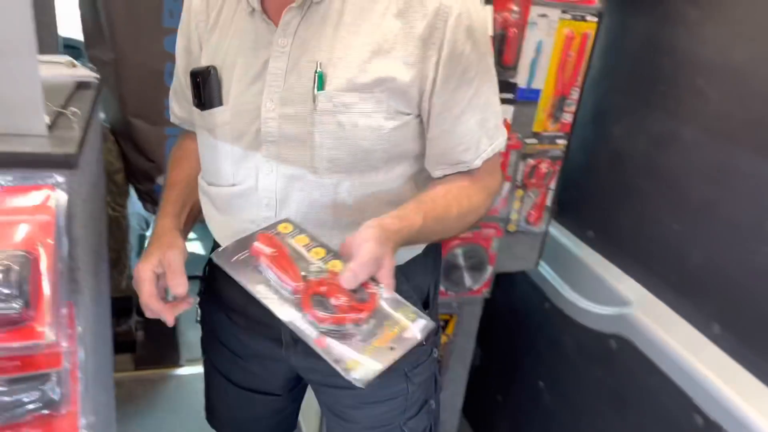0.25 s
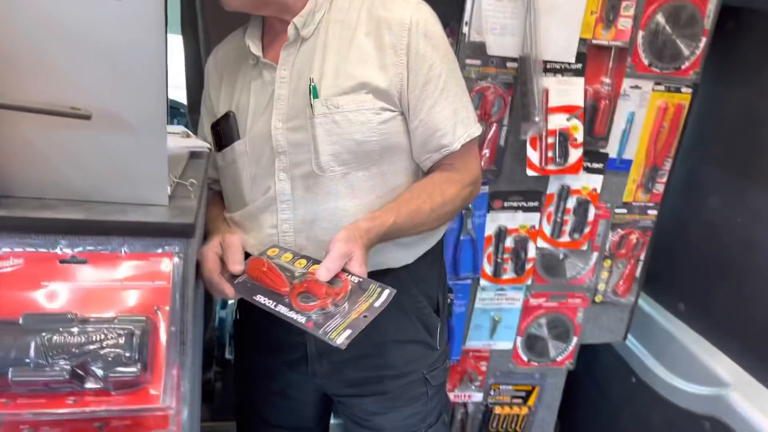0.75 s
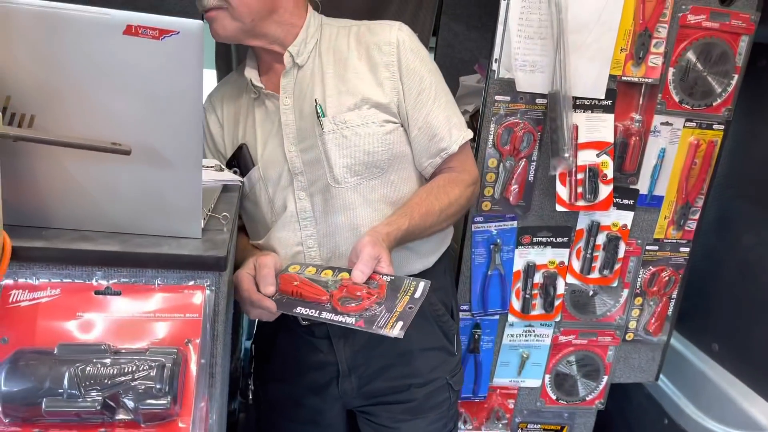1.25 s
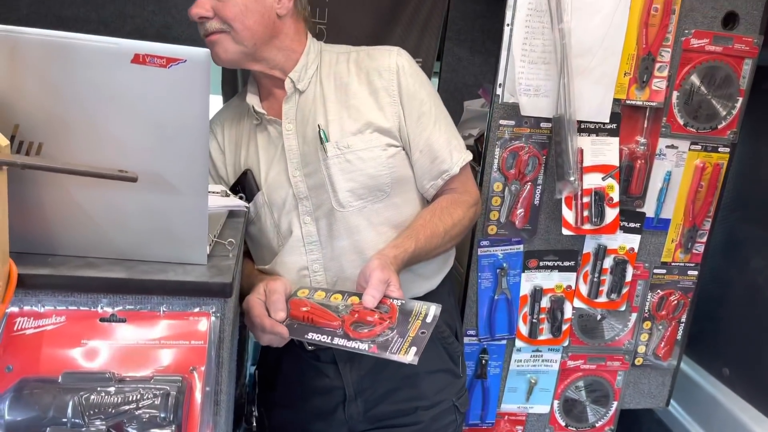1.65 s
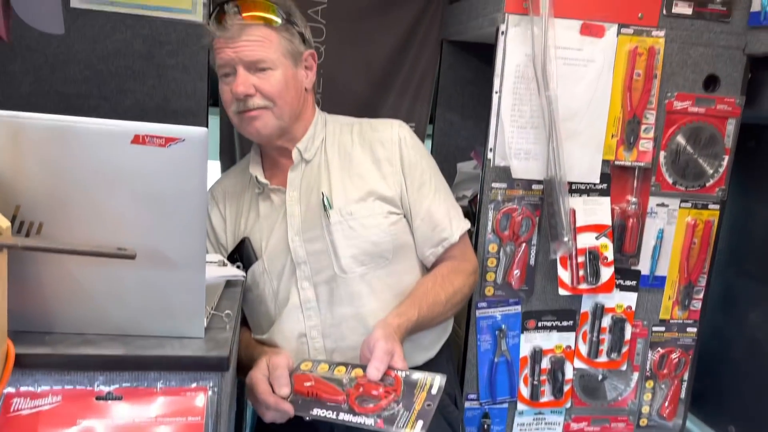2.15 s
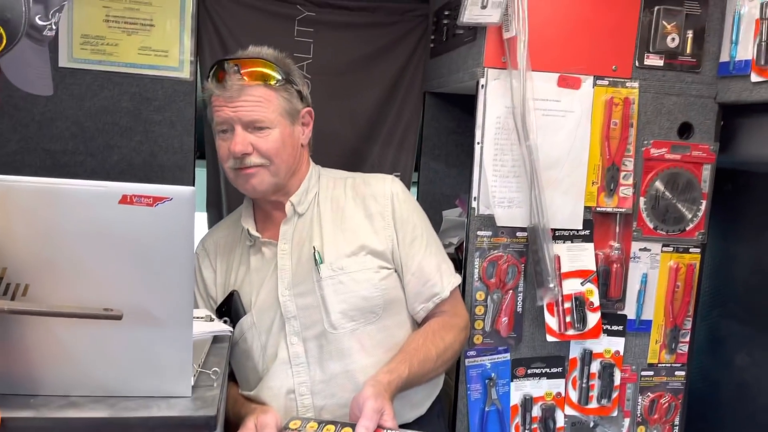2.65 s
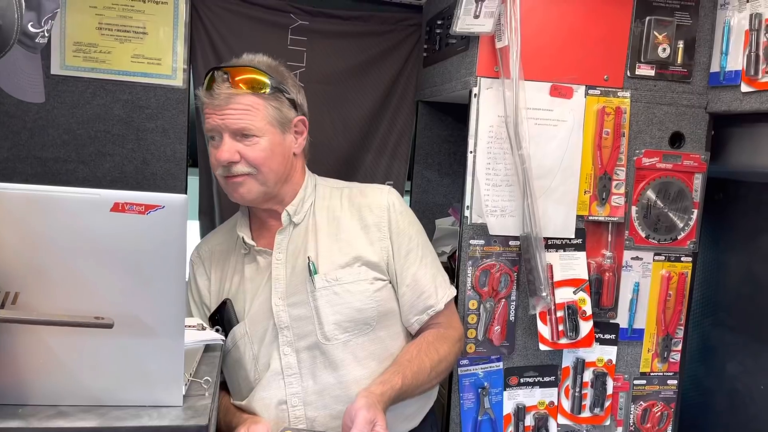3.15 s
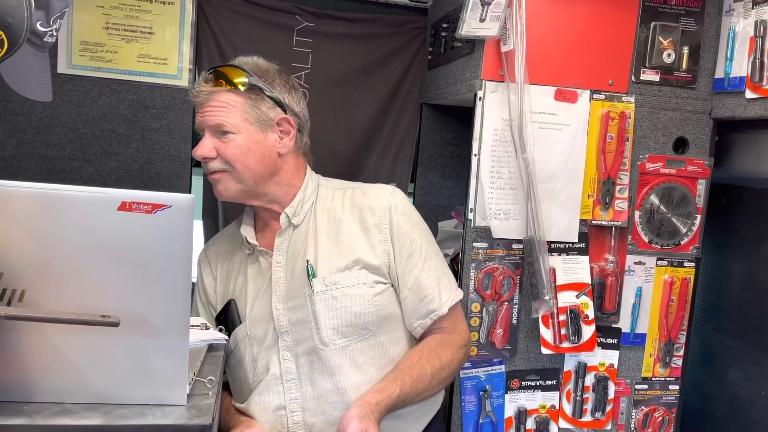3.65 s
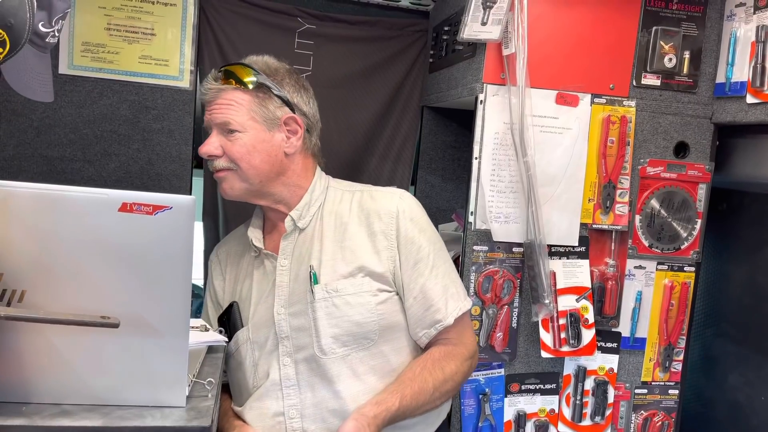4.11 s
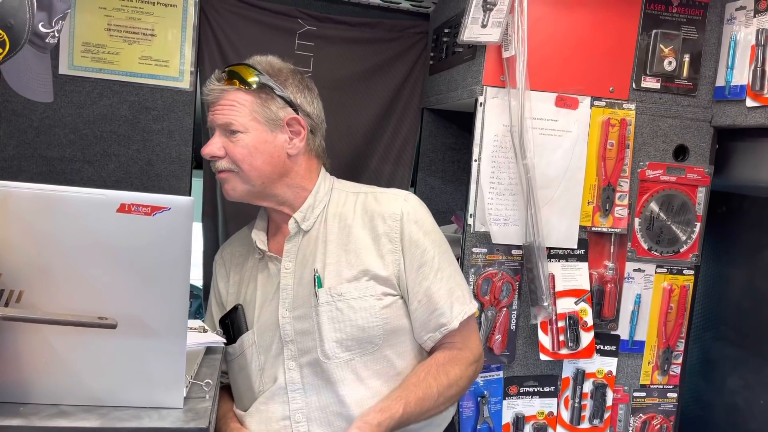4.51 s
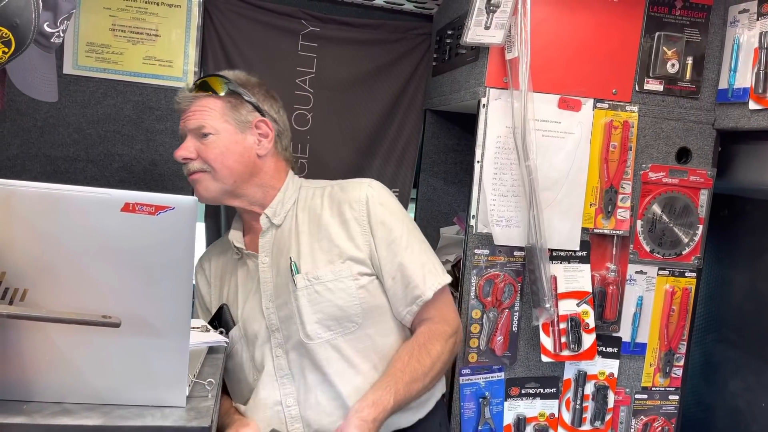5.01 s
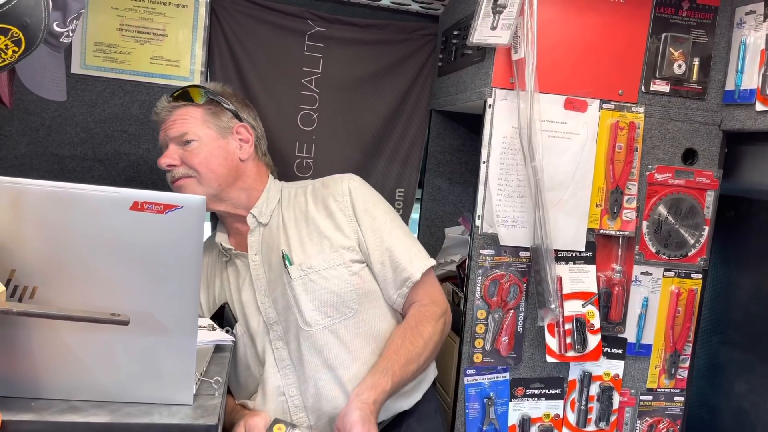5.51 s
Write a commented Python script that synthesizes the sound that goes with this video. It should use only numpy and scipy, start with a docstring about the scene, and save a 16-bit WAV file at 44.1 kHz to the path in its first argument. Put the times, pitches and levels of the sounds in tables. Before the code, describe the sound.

A deep, steady motor hum near mains pitch runs throughout, swelling and dipping slightly, with a slower compressor drone and boomy rumble in a parked truck's enclosed cargo box. Above it lie soft rushing duct air, a faint mid-high fan whine, a barely audible whistle and a narrow airy whirr, with resonant singing strongest around 1 to 2 s. A faint hiss covers the first second or so. A dull knock on a plastic pack comes at 0.1 s; at about 0.5 s a short rough rub with squeaky chirps and a small knock, then a low soft thump at 0.6. Cloth brushes at 0.8 s. Another light knock at 1.25 s leads into a quick run of tiny bright ticks at 1.3. A low swell passes at 2.5 s. Very faint ticks follow at 4.15 and 4.5 s, and a light cloth brush at 5.2 s. Stereo microphones, handling close, no voice.

```python
"""A motor hums at its shaft speed and beats against the mains, in cooling equipment inside a parked truck.
Its eleven-bladed fan whines and a slower compressor drones; these, a whistle and low thumps are sine waves.
Air rushes, booms, whirrs and sings in the cargo box and duct: shaped noise, with its own colour and phase
at each of two microphone ports. Close by, a plastic pack is knocked, rubbed and ticks, and cloth brushes
softly over long faint hisses: dying sines, brief chirps and glints, and rough noise."""
import sys
import numpy as np
from scipy import signal
from scipy.fft import rfft, irfft, next_fast_len
from scipy.io import wavfile
from scipy.ndimage import uniform_filter1d, map_coordinates

SR = 44100
rng = np.random.default_rng(int(sys.argv[2]) if len(sys.argv) > 2 else 0)


def waveform_to_disk(signal):
    """Save audio, clipped to [-1, 1], as 16-bit WAV at the path in sys.argv[1]."""
    frames = np.transpose(np.atleast_2d(signal))
    scaled = np.clip(frames, -1, 1) * 32767
    samples = np.round(scaled).astype(np.int16)
    wavfile.write(sys.argv[1], SR, samples)


N = 254456
T = np.arange(N) / SR  # time of every sample, in seconds

# Fan motor speed: (time [s], speed [turns per s])
SHAFT_SPEED = [(0, 57.44), (.7, 57.45), (1.3, 57.51), (5.77, 57.5)]
# Shaft hum heard together with the low rumble around its pitch: (time [s], rms level [dB])
HUM_LEVEL = [(0.0, -32), (0.17, -33), (0.35, -28.5), (0.8, -33), (1.1, -30), (1.4, -30), (1.6, -33),
             (1.75, -27.5), (1.95, -32), (2.25, -30.5), (2.4, -34), (2.57, -27.5), (2.83, -33),
             (3.01, -27.5), (3.6, -31), (3.75, -28.5), (4.0, -30.5), (4.12, -28), (4.25, -31.5),
             (4.55, -30.5), (4.69, -37), (4.82, -30), (5.0, -29), (5.3, -32), (5.77, -32)]
MAINS_HZ, MAINS_DB = 60.01, -51.5  # mains hum and its rms level
IN_STEP_S = 2.597  # a moment when the two hums are in step
# Compressor drone: (multiple of its turning speed [-], rms level [dB], waver [dB])
COMPRESSOR_TONES = [(1, -41.5, -0.5), (3, -63.5, 1), (5, -57.5, 3), (6, -54, -0.5)]
# Weak motor tones: (multiple of the shaft speed [-], rms level [dB], waver [dB])
MOTOR_OVERTONES = [(2, -54, 1), (12, -85, 1)]
# Fan blade whine before the gain of each port: (time [s], rms level [dB])
WHINE_LEVEL = [(0, -51.5), (1, -51.5), (1.5, -52.5), (4.5, -53.5), (5.2, -56.5), (5.77, -53.5)]
WHISTLE_HZ = 2821.4

# How alike the two ports hear diffuse sound: (frequency [Hz], likeness [0 to 1])
PORT_LIKENESS = [(60, 0.99), (250, 0.91), (500, 0.78), (800, 0.4), (1100, 0.54), (1500, 0.15), (2000, 0.64),
                 (2300, 0.59), (3900, .55), (5200, 0.2), (6400, 1), (8100, 0.57), (8500, 1), (11500, 0.96)]
# Phase of the left channel against the right; near 10 kHz they are opposite: (frequency [Hz], phase [rad])
LEFT_PHASE = [(60, 0), (350, .2), (800, .85), (1150, .25), (1400, 0), (1600, -2.5), (1980, -3.8),
              (2330, -5.3), (2900, -4.75), (4300, -5.8), (7500, -5.4), (8400, -6.28), (8900, -6.28),
              (9900, -9.42), (11000, -9.42), (11500, -12.56)]
# How much louder the left port is than the right: (frequency [Hz], level difference [dB])
LEFT_OVER_RIGHT = [(60, 0), (430, 0.5), (620, 2.5), (1000, -0.5), (1380, 7), (1700, 4), (2200, 1),
                   (4000, 4.5), (5000, 3.5), (6100, 5.5), (7100, 2), (8500, 0.5)]

# Colour of the cargo box boom: (frequency [Hz], relative level [dB per Hz])
BOOM_COLOUR = [(20, -64), (40, -14), (55, -3), (65, -8), (80, -2), (98, -6.5), (124, -5.5), (160, -15),
               (205, -14), (260, -20), (420, -23.5), (480, -34), (600, -64)]
# Cargo box resonance just under the hum: (frequency [Hz], width [Hz], lift [dB])
BOX_RESONANCE = [(52, 9, 4)]
# Colour of the air stream: (frequency [Hz], relative level [dB per Hz])
AIR_COLOUR = [(350, -5.5), (550, 4.5), (800, -2.5), (1400, -1.5), (1620, -4), (1980, -5), (2300, -10.5),
              (3600, -18), (5400, -23), (7800, -26.5), (8700, -32), (9600, -30.5), (10700, -38),
              (11200, -55), (11900, -73)]
# Duct resonances: (frequency [Hz], width [Hz], lift [dB])
DUCT_RESONANCES = [(510, 33, 1), (781, 26, 6), (945, 42, 6.5), (1075, 41, 1.5), (1183, 43, 5),
                   (1325, 25, 4.5), (1813, 19, 7.5), (1940, 80, 6)]
BOOM_DB, AIR_DB = -35.5, -49  # middle levels that the boom and air waver around

# Narrow whirr in the air stream: (time [s], centre frequency [Hz], rms level [dB])
WHIRR_PATH = [(0, 1430, -76), (.7, 1460, -67), (1.1, 1416, -61), (2.2, 1420, -64), (2.8, 1386, -64.5),
              (3.25, 1405, -60.5), (3.9, 1393, -62.5), (4.4, 1360, -60.5), (5, 1405, -67),
              (5.77, 1408, -67)]
WHIRR_RATE = 35  # random knots per second; more make the whirr wider in pitch
# Duct resonances that come and go: (frequency [Hz], width [Hz], relative level [dB])
SINGING_BANDS = [(918, 45, -0.5), (1940, 90, -2)]
# Strength of the singing before the two bands' own levels: (time [s], level [dB])
SINGING_LEVEL = [(0, -72), (.7, -69), (1.2, -64), (1.9, -62), (2.3, -75), (3, -69.5), (3.8, -72),
                 (4.5, -80.5), (5.77, -76)]

# Cloth brushes, then two long faint hisses that swell and fade:
# (start [s], rise [s], hold [s], fall per 20 dB [s], held level [dB], tilt [dB per octave])
BRUSHES_AND_HISSES = [(0.805, 0.052, 0.055, 0.15, -55.5, -1), (5.178, 0.02, 0.09, 0.09, -60, -1.5),
                      (0, 0.037, 0.42, 0.4, -64.5, -1.5), (0.1, 0.28, 0.72, 0.52, -71.5, -0.5)]
# Colour of brushes and hisses before tilting: (frequency [Hz], relative level [dB per Hz])
SOFT_COLOUR = [(800, -9.5), (2000, 2.5), (3500, -2.5), (5000, -1.5), (6500, -4.5), (7400, -6.5), (8500, -1),
               (9600, -4), (10300, -4), (11000, 0), (11500, -12), (11900, -35)]
# Rubs on the pack: (start [s], rise [s], hold [s], fall per 20 dB [s], held level [dB], tilt [dB per octave])
PACK_RUBS = [(0.468, 0.005, 0.045, 0.04, -51, 3.5), (0.473, 0.012, 0.006, 0.02, -47, -3),
             (0.484, 0.008, 0.009, 0.022, -41, -1.5), (0.517, 0.009, 0.013, 0.04, -42.5, -4.5)]
# Colour of rubbed plastic before tilting: (frequency [Hz], relative level [dB per Hz])
RUB_COLOUR = [(300, -24), (800, -5), (1300, 2), (1800, 6.5), (2600, 0.5), (4400, -5.5), (5500, -1.5),
              (6800, -6.5), (8500, -5.5), (9500, -1), (10200, -2), (10900, 5.5), (11400, -10), (11800, -40)]
CATCHES_PER_S, CATCH_DECAY_S = 500, .0012  # how often the rough noise catches, and how fast a catch fades

# Dull knocks on the pack: (time [s], strength [dB])
KNOCKS = [(0.1074, -26), (.535, -36), (1.246, -34.5)]
# Ringing of the pack: (frequency [Hz], relative level [dB], time to fall 60 dB [s])
PACK_MODES = [(235, -8, .05), (290, -4, 0.12), (358, 4, 0.06), (440, -9, 0.04), (690, -17, 0.03),
              (1430, -8.5, 0.035), (1670, -18, .03), (2120, -16, .03), (2690, -20, .03), (3300, -27, .025)]
# Colour of a knock's contact noise: (frequency [Hz], relative level [dB per Hz])
CONTACT_COLOUR = [(600, -20), (1400, 1.5), (2500, -10), (4500, -26), (7000, -42)]
SCUFF_LEAD_S = .003  # the contact noise begins just before the pack rings

# Chirps of handled plastic, and brief high glints within the rubs, before port balance:
# (centre [s], length [s], lowest tone [Hz], rms tone level at the centre [dB], fall per overtone [dB])
CHIRPS_AND_GLINTS = [(.496, .018, 1290, -47, 3), (.505, .012, 1600, -52, 20), (.527, .005, 1950, -43.5, 16),
                     (.534, .007, 3380, -54, 20), (.496, .008, 5400, -56, 30), (.491, .008, 9450, -57, 30),
                     (.532, .004, 5900, -58, 30), (.478, .014, 1550, -51, 20), (.494, .01, 2600, -53, 20),
                     (.537, .008, 900, -48, 12), (.547, .008, 1300, -54, 20), (5.241, .022, 2450, -63, 20),
                     (.858, .012, 2050, -62, 12), (.495, .006, 10800, -57, 30),
                     (.501, .006, 10850, -58, 30), (.472, .006, 10800, -62, 30),
                     (.475, .008, 8900, -60, 30)]
# Brief swells of the rumble: (centre [s], length [s], frequency [Hz], rms tone level at the centre [dB])
THUMPS = [(0.625, 0.062, 105, -33.5), (2.544, 0.14, 122, -35)]

# Ticks of stiff plastic, some in quick runs: (time [s], strength [dB], pitch that rings most [Hz])
TICKS = [(1.3122, -55, 9200), (1.3156, -53, 9200), (1.3175, -61, 6500), (1.3215, -53.5, 9100),
         (1.323, -65, 5800), (1.3265, -56, 9400), (4.1577, -63, 10700), (4.1585, -66, 9400),
         (4.5175, -64, 10600), (4.5185, -62, 6500), (4.52, -62, 5700), (4.522, -63, 8200),
         (4.5265, -61, 9000)]
# Ringing of the plastic shell: (frequency [Hz], time to fall 60 dB [s])
SHELL_MODES = [(5700, .07), (6510, .03), (8190, .05), (9020, .04), (9180, .035), (9590, .04), (10700, .025)]
# Colour of a tick's noise: (frequency [Hz], relative level [dB per Hz])
TICK_COLOUR = [(2000, -16), (4800, -11), (5700, -7), (6900, -10), (8200, -7), (9300, -2), (10200, -8),
               (11200, -8), (11600, -30)]
SPREAD_HZ = 400  # how far from its pitch a tick excites the shell
CRACK_DB, CRACK_T60_S = -5, .006  # sharp crack: level within a tick, time to fall 60 dB
HISS_DB, HISS_T60_S = -11, 0.21  # longer hiss in the box: the same two settings

# Microphone fade at the top: (frequency [Hz], gain [dB])
MIC_FADE = [(11100, 0), (11500, -8), (12000, -12)]
TOP_HZ, FADE_S = 12091, .005  # recorder band limit; fade-out at the very end


def amp(db):
    """Turn decibels into a gain."""
    return 10 ** (np.asarray(db) / 20)


def unit(x):
    """Scale x to an rms level of 1."""
    return x / np.sqrt(np.mean(x ** 2) + 1e-20)


def along(points, hz):
    """Read a (frequency, value) table on a logarithmic frequency axis."""
    f, v = np.transpose(points)
    return np.interp(np.log(hz + 1), np.log(f + 1), v)


def curves(rows):
    """Turn each column after the time into one value per sample."""
    seconds, *columns = np.transpose(rows)
    return [np.interp(T, seconds, column) for column in columns]


def wobble(rate):
    """Draw a smooth random curve through this many knots per second."""
    knots = rng.standard_normal(int(N * rate / SR) + 4)
    return map_coordinates(knots, [T * rate])


def filtered(x, response):
    """Filter x by multiplying its spectrum by a function of frequency."""
    size = next_fast_len(x.shape[-1] + 8192)
    spectrum = rfft(x, size) * response(np.fft.rfftfreq(size, 1 / SR))
    return irfft(spectrum, size)[..., :x.shape[-1]]


def tone(hz, level_db):
    """Make a sine that follows a frequency and an rms level."""
    turns = np.cumsum(hz * np.ones(N)) / SR + rng.random()
    return np.sqrt(2) * amp(level_db) * np.sin(2 * np.pi * turns)


def swell(centre, length):
    """Rise and fall smoothly around a moment."""
    return np.exp(-(2 * (T - centre) / length) ** 2)


def diffuse(spectrum, size=N, peaks=()):
    """Make noise at rms 1 that the ports partly share, with their own phase and balance."""
    def shared_and_own(hz):
        turn = np.arccos(np.clip(along(PORT_LIKENESS, hz), 0, 1)) / 2
        lift = sum(db / (1 + (2 * (hz - centre) / width) ** 2) for centre, width, db in peaks)
        return amp(along(spectrum, hz) + lift) * np.array([np.cos(turn), np.sin(turn)])

    def phase_and_balance(hz):
        left_to_right = amp(along(LEFT_OVER_RIGHT, hz)) * np.exp(1j * along(LEFT_PHASE, hz))
        return left_to_right ** np.array([[.5], [-.5]])  # half to each port, in opposite directions

    shared, own = filtered(rng.standard_normal((2, size)), shared_and_own)
    return unit(filtered(np.array([shared + own, shared - own]), phase_and_balance))


def hum(shaft):
    """The shaft hum beats against the weaker mains hum, as the motor slips a little behind the mains."""
    shaft_turns = np.cumsum(shaft) / SR + rng.random()
    mains_turns = MAINS_HZ * (T - IN_STEP_S) + np.interp(IN_STEP_S, T, shaft_turns)
    shaft_hum = amp(curves(HUM_LEVEL)[0]) * np.sin(2 * np.pi * shaft_turns)
    mains_hum = amp(MAINS_DB) * np.sin(2 * np.pi * mains_turns)
    return np.sqrt(2) * (shaft_hum + mains_hum)


def motors():
    """Turning parts give tones at multiples of their speed; the whine is later and louder at the right."""
    shaft = curves(SHAFT_SPEED)[0]
    crank = shaft * 3 / 5  # the compressor turns at three fifths of the motor speed
    low = hum(shaft)
    for order, db, waver in COMPRESSOR_TONES:
        low = low + tone(order * crank, db + waver * wobble(3.03))
    for order, db, waver in MOTOR_OVERTONES:
        low = low + tone(order * shaft, db + waver * wobble(1.5))
    whine = tone(11 * shaft, curves(WHINE_LEVEL)[0] + 0.5 * wobble(7.4))  # eleven blades pass per turn
    whine = np.pad(whine, (8, 0))  # the right port lags by 8 samples
    return low * amp([[-.15], [.15]]) + np.array([amp(-3.5) * whine[8:], amp(-0.5) * whine[:N]])


def whistle():
    """A faint wavering sine reaches the right port five samples later and 3 dB weaker."""
    sound = np.pad(tone(WHISTLE_HZ, -83 + 2.5 * wobble(3)), (5, 0))
    return np.array([amp(3) * sound[5:], sound[:N]])


def air():
    """Turbulent flow makes noise: the boom rings in the box, the nearly even hiss in the duct."""
    boom_db = BOOM_DB + 0.4 * wobble(0.49) + 0.19 * wobble(4.9)
    boom = amp(boom_db) * diffuse(BOOM_COLOUR, peaks=BOX_RESONANCE)
    hiss_db = AIR_DB + 0.49 * wobble(4.56) + 0.74 * wobble(18)
    return boom + amp(hiss_db) * diffuse(AIR_COLOUR, peaks=DUCT_RESONANCES)


def whirr():
    """Random curves turn a drifting tone into narrow noise, louder at the left port."""
    hz, db = curves(WHIRR_PATH)
    turn = 2 * np.pi * np.cumsum(hz) / SR

    def band():
        return wobble(WHIRR_RATE) * np.cos(turn) + wobble(WHIRR_RATE) * np.sin(turn)

    shared = band()
    right = 0.68 * shared + 0.62 * band()  # only partly the same as the left
    return amp(db) * unit(np.array([amp(4.0) * shared, amp(-3.5) * right]))


def singing():
    """Air sings in two duct resonances: two narrow bands of noise that come and go together."""
    bands = np.zeros((2, N))
    for hz, width, db in SINGING_BANDS:
        band = [(hz - width, -40), (hz - width / 2, 0), (hz + width / 2, 0),
                (hz + width, -40), (hz + 2 * width, -120)]
        bands += amp(db) * diffuse(band)
    return amp(curves(SINGING_LEVEL)[0]) * bands


def tilted(colour, tilt_db):
    """Make a colour brighter by tilt_db per octave, pivoting at 3000 Hz."""
    return [(hz, level + tilt_db * np.log2(hz / 3000)) for hz, level in colour]


def strokes(rows, colour, grit_db):
    """Make swelling noise that is patchy in pitch and roughened by brief catches at random moments."""
    out, t = np.zeros((2, N + SR)), np.arange(SR) / SR
    for start, rise, hold, fall, db, tilt_db in rows:
        stroke = np.clip(t / rise, 0, 1) * amp(-20 * np.clip(t - rise - hold, 0, None) / fall)
        cells = signal.stft(diffuse(tilted(colour, tilt_db), size=SR), nperseg=128)[2]
        # Random gains, smoothed over neighbouring pitches and moments, make the patches.
        patches = uniform_filter1d(rng.standard_normal(cells.shape[1:]), size=4, axis=0)
        patches = uniform_filter1d(patches, size=2, axis=1)
        grainy = signal.istft(cells * amp(1.5 * unit(patches)), nperseg=128)[1][:, :SR]
        catches = (rng.random(SR) < CATCHES_PER_S / SR) * rng.random(SR)
        grit = np.convolve(catches, np.exp(-t[:400] / CATCH_DECAY_S))[:SR]
        rough = unit(grainy * (1 + amp(grit_db) * grit))
        out[:, round(start * SR):][:, :SR] += amp(db) * stroke * rough
    return out[:, :N]


def rubs():
    """Cloth brushes, long faint hisses and rubs on the plastic pack are all rough, patchy noise."""
    soft = strokes(BRUSHES_AND_HISSES, SOFT_COLOUR, grit_db=-1)
    return soft + strokes(PACK_RUBS, RUB_COLOUR, grit_db=-1.5)


def taps():
    """Each dull knock makes a short contact noise and rings the pack in dying sines."""
    out, t = np.zeros((2, N + SR)), np.arange(SR // 4) / SR
    for s, db in KNOCKS:
        ring = sum(amp(level - 60 * t / t60) * np.sin(2 * np.pi * hz * t) for hz, level, t60 in PACK_MODES)
        ring = ring * (1 - np.exp(-t / 0.002))  # soft start
        scuff = amp(-14.5 - 60 * t / 0.038) * diffuse(CONTACT_COLOUR, size=len(t))
        scuff = scuff * (1 - np.exp(-t / 0.001))
        out[:, round(s * SR):][:, :len(t)] += amp(db) * ring
        out[:, round((s - SCUFF_LEAD_S) * SR):][:, :len(t)] += amp(db) * scuff
    return out[:, :N]


def chirps_and_glints():
    """Plastic chirps and high glints: a tone and any overtones below the band limit, in a smooth swell."""
    out = np.zeros(N)
    for s, length, hz, db, fall_db in CHIRPS_AND_GLINTS:
        tones = sum(tone((k + 1) * hz, db - k * fall_db) for k in range(3) if (k + 1) * hz < TOP_HZ)
        out += swell(s, length) * tones
    return out * amp([[1.5], [-1.5]])  # louder at the left port


def thumps():
    """Low tones swell softly in the box, alike at both ports."""
    return sum(swell(s, length) * tone(hz, db) for s, length, hz, db in THUMPS)


def ticks():
    """Each tick is a crack that rings the shell near its pitch and leaves a short hiss in the box."""
    out, t = np.zeros((2, N + SR)), np.arange(SR // 4) / SR
    for s, db, pitch_hz in TICKS:
        ring = np.zeros(len(t))
        for hz, t60 in SHELL_MODES:
            nearness = np.exp(-((hz - pitch_hz) / SPREAD_HZ) ** 2)
            decay = amp(rng.normal(0, 1) - 60 * t / t60)  # random strength for each mode
            ring += nearness * decay * np.sin(2 * np.pi * hz * t)
        crack_fade = amp(CRACK_DB - 60 * t / CRACK_T60_S)
        hiss_fade = amp(HISS_DB - 60 * t / HISS_T60_S)
        noise = diffuse(TICK_COLOUR, size=len(t)) * (crack_fade + hiss_fade)
        out[:, round(s * SR):][:, :len(t)] += amp(db) * (ring + noise) * (1 - np.exp(-t / .0008))
    return out[:, :N]


def scene():
    """Add up all sources at the two ports."""
    machine = motors() + whistle()
    flow = air() + whirr() + singing()
    close_by = rubs() + taps() + chirps_and_glints() + ticks()
    return machine + flow + close_by + thumps()


def record(dry):
    """The microphone fades at the top and the recorder keeps nothing above its band limit."""
    faded = dry * np.clip((T[-1] - T) / FADE_S, 0, 1)
    return filtered(faded, lambda hz: amp(along(MIC_FADE, hz)) * (hz < TOP_HZ))


dry = scene()
out = record(dry)
waveform_to_disk(out)
```